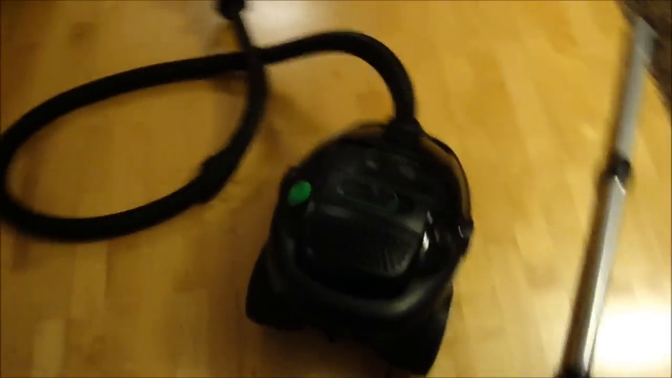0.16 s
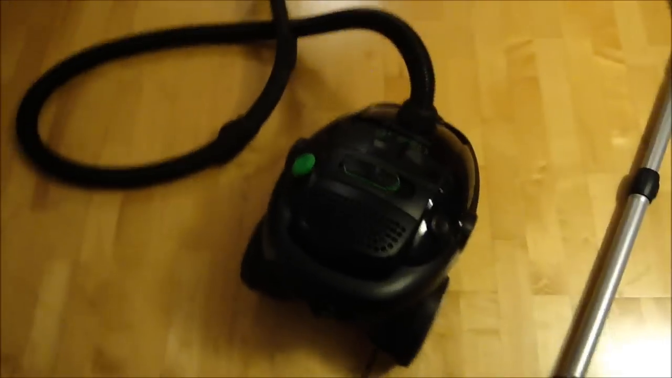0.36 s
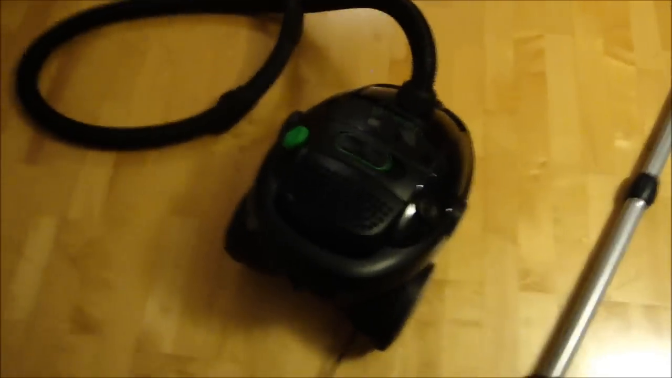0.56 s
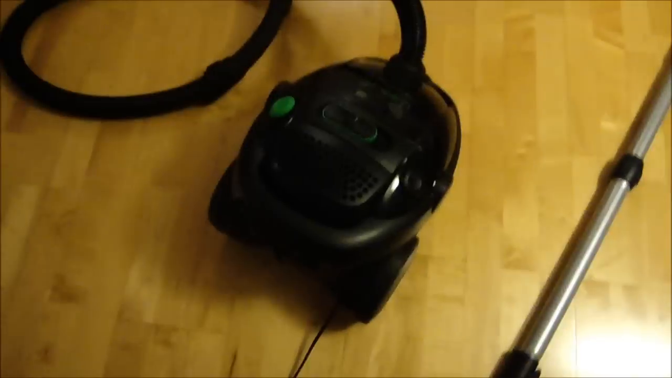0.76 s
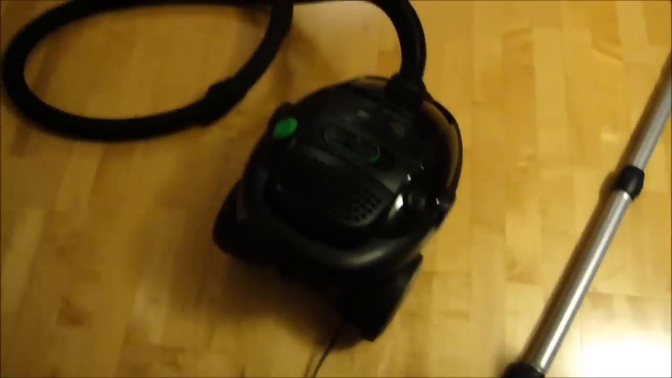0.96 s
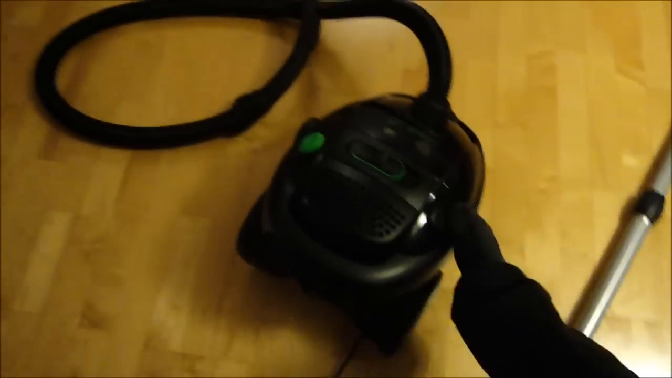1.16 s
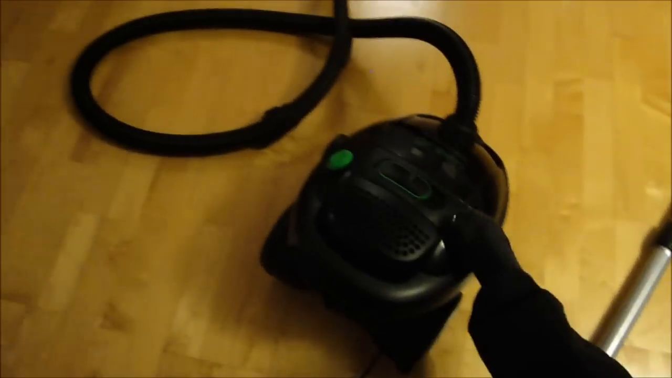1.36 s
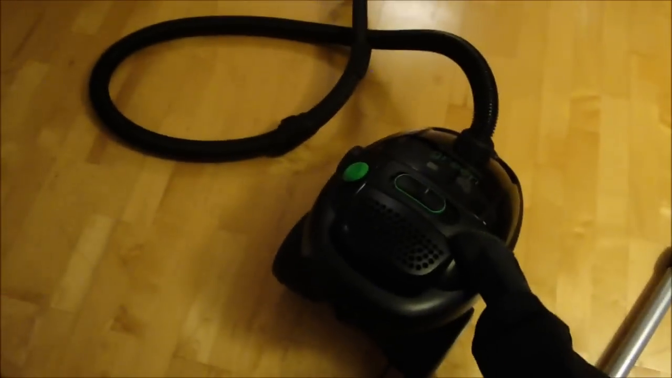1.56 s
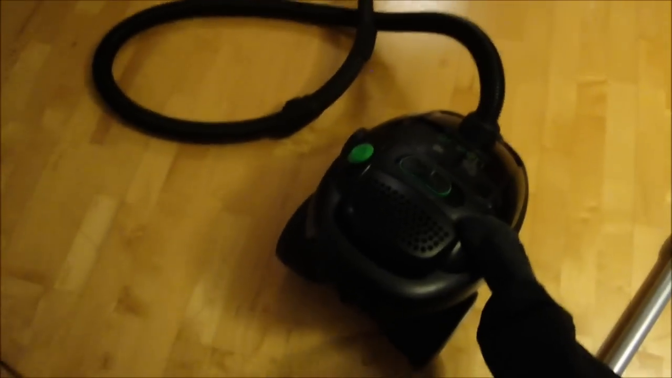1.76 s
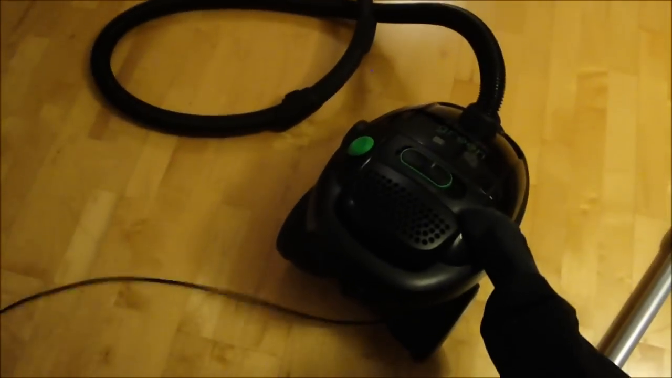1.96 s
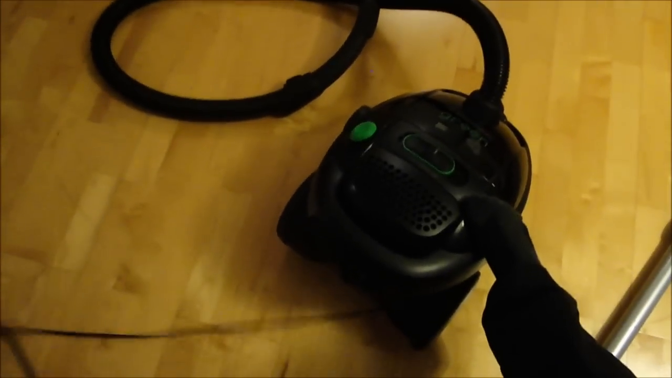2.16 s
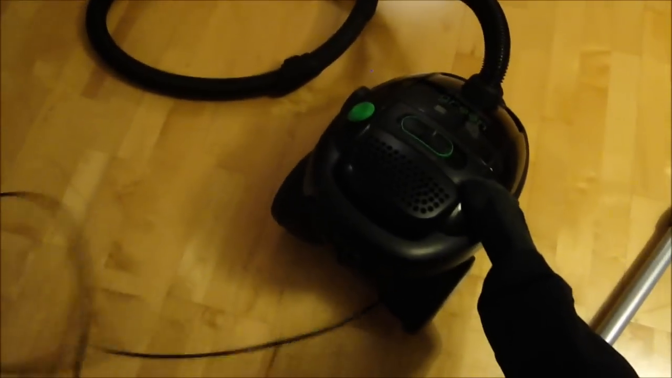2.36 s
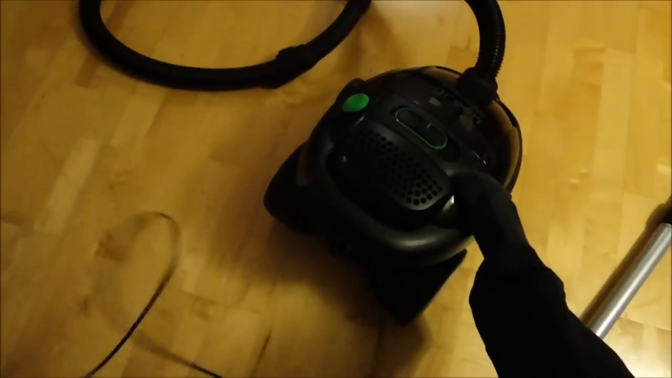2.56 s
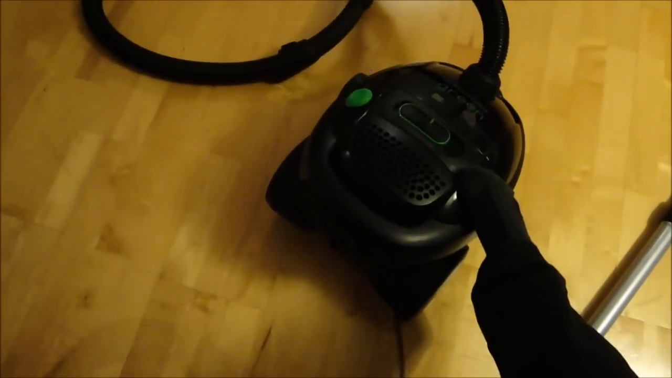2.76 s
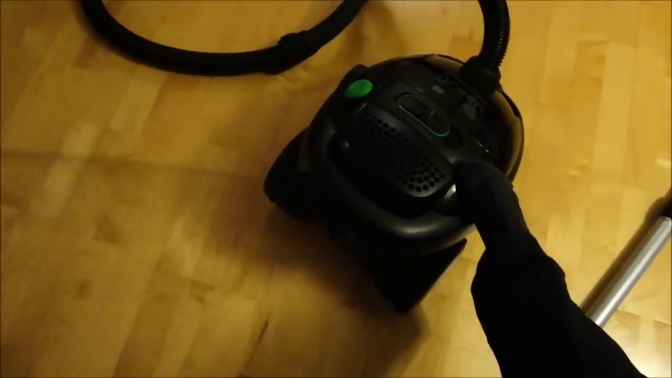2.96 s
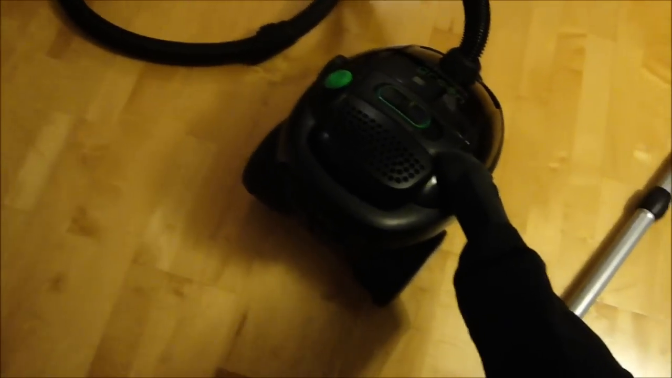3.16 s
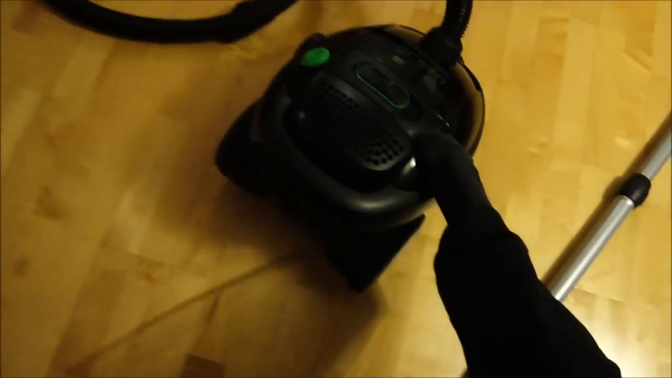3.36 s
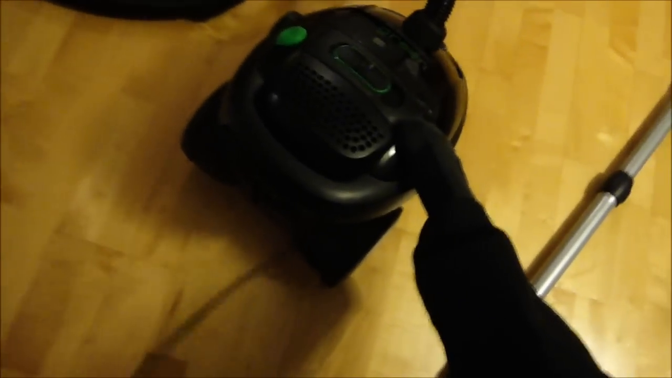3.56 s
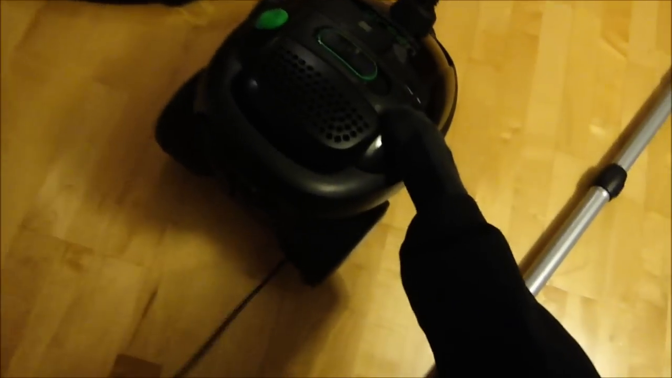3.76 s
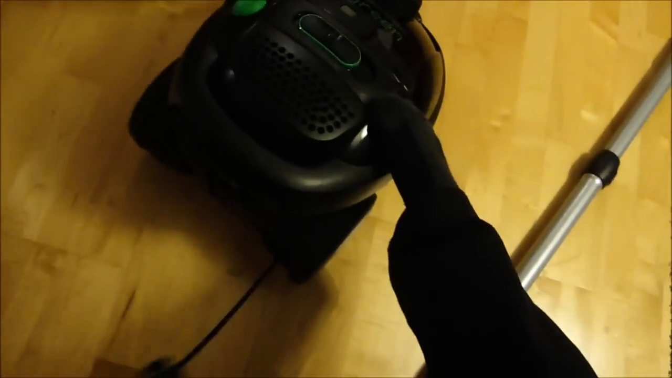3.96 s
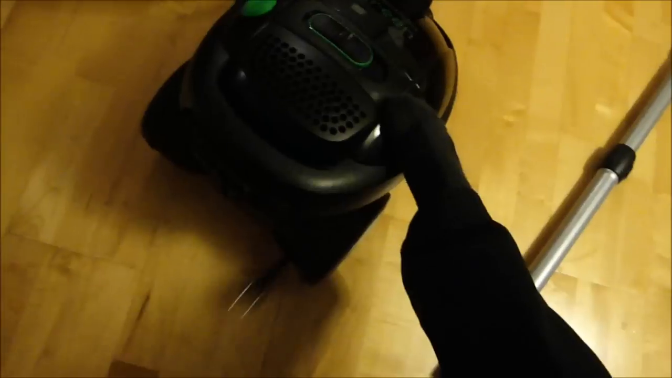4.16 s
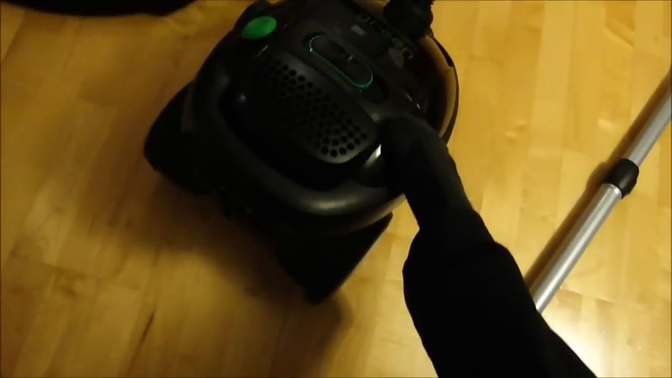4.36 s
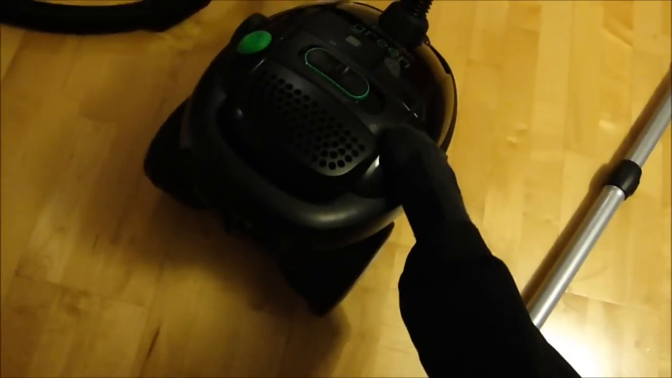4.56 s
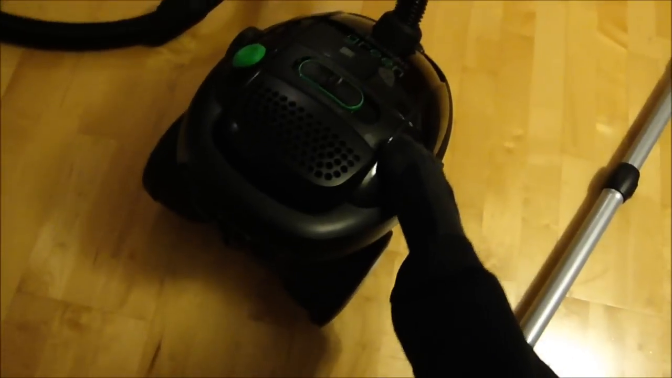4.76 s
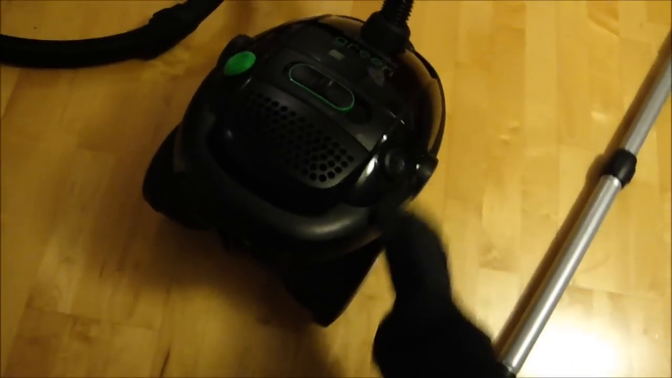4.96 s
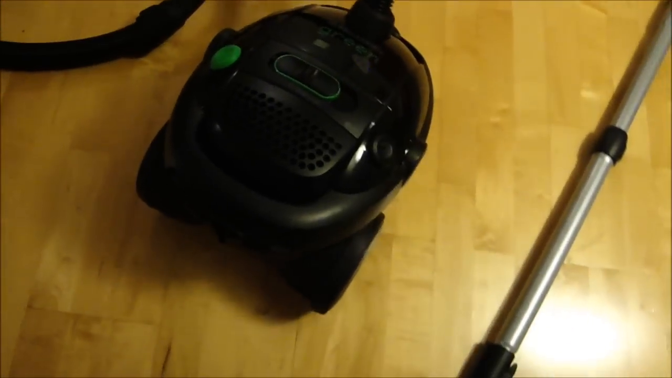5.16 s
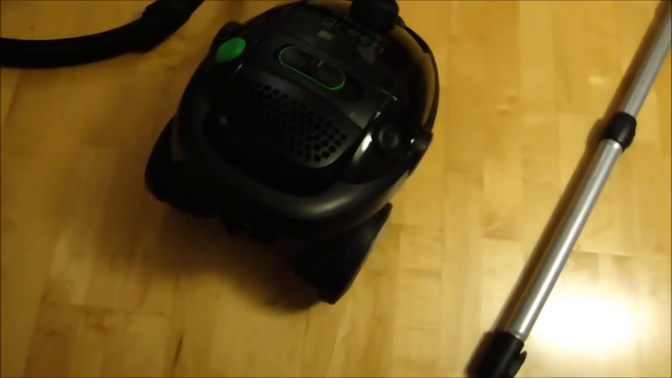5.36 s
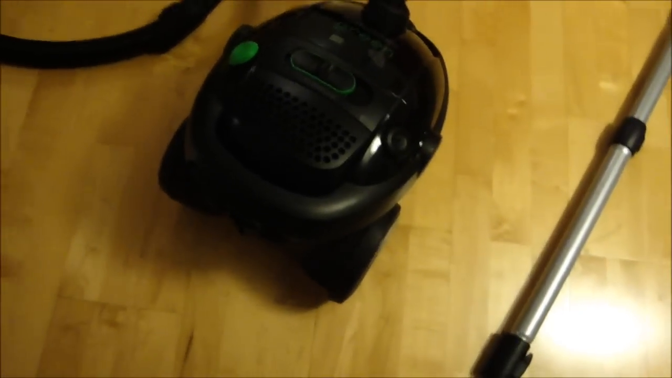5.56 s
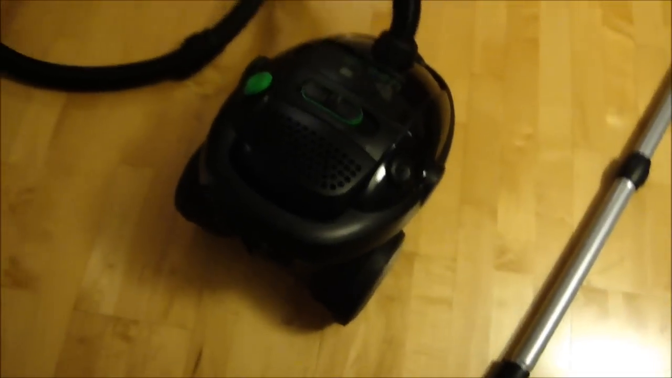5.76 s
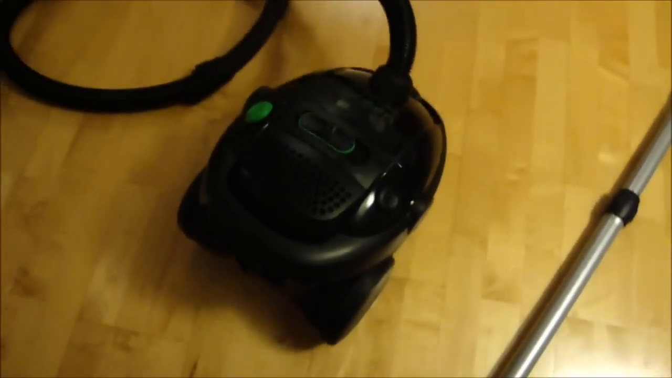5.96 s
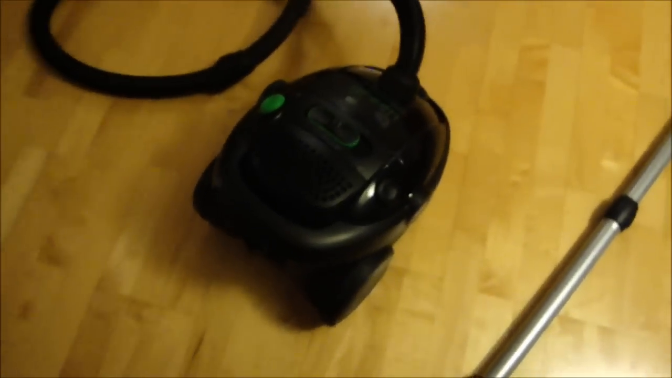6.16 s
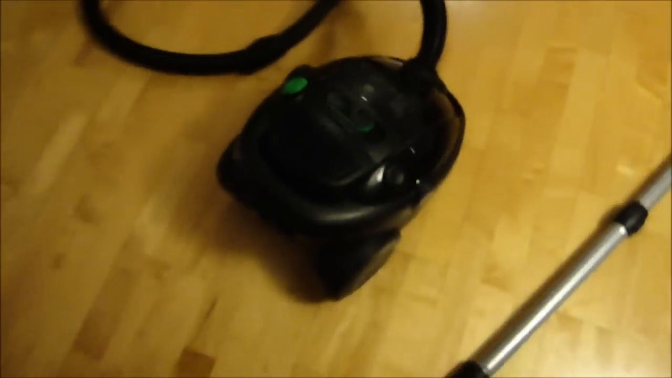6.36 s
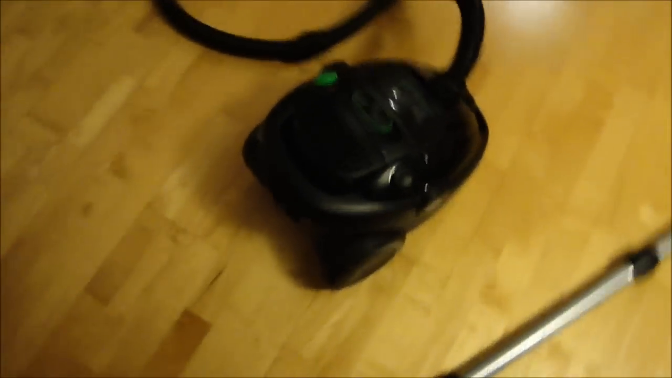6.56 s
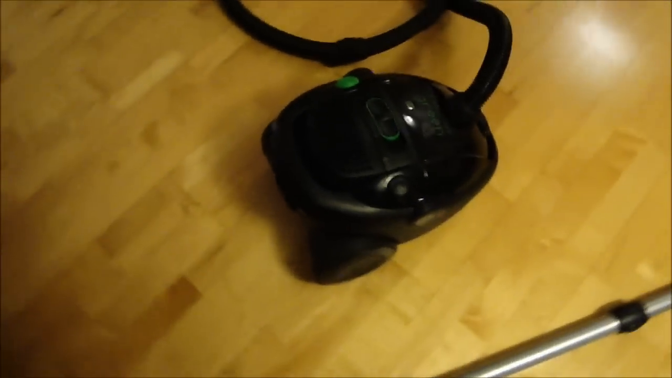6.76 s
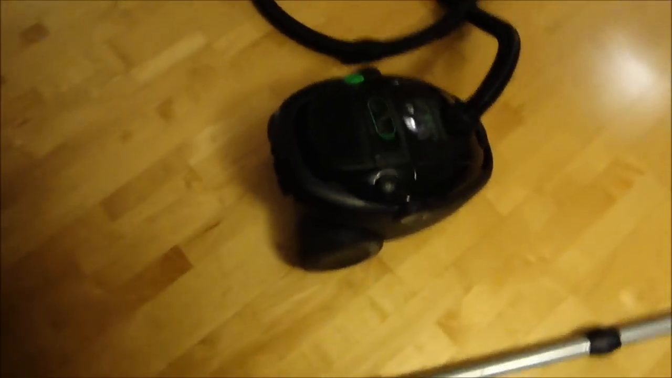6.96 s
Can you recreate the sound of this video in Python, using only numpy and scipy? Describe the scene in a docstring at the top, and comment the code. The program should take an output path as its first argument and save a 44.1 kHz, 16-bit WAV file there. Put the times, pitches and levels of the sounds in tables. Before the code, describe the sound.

Close, plain sound of a vacuum cleaner rewinding its cable indoors: quiet scuffing first, then a whirring plastic chatter with scraping cord and irregular hard slaps on floor and casing. The whipping thins as the reel slows with faint squeaks. A heavy bang and rattling shudder end the run, ringing briefly in the lively room. Afterward only light rustles, faint rapid motor ticks, a few knocks and low background noise remain.

```python
"""Vacuum cleaner cord rewinding on a wooden floor

In a small hard room feet shuffle and small knocks sound close to the microphone. With the rewind pedal down,
the spring reel rattles in its plastic housing (random contacts ringing resonances) and the cord hisses over
the boards (coloured contacts) and whips floor and shell (short noise bursts). The slowing reel squeaks in thin
tones, the plug slams home, the shell shudders, and a small motor ticks. Room hum and microphone hiss lie below.
"""
import sys
import numpy as np
from scipy import signal
from scipy.fft import rfft, irfft
from scipy.io import wavfile
from scipy.ndimage import uniform_filter1d

SR = 44100
rng = np.random.default_rng(int(sys.argv[2]) if len(sys.argv) > 2 else 0)


def to_wav(sig):
    """Store sig (one row per channel, or 1-D mono) as 16-bit WAV at the path in sys.argv[1].

    Samples outside -1..1 are clipped; the rate is SR.
    """
    pcm = np.clip(np.atleast_2d(sig), -1, 1) * 32767
    pcm = np.round(pcm).astype(np.int16)
    wavfile.write(sys.argv[1], SR, pcm.T)  # frames by channels


N = 308700
T = np.arange(N) / SR

# cord and plug whip floor and shell; levels hold before the bass cut of the shell:
# (time [s], peak level [dB], centre pitch [Hz], snap relative to the peak [dB])
WHIPS = [(1.6021, -32, 1800, -8), (1.728, -26, 670, -20), (1.7653, -24, 1180, -34),
         (1.8544, -23.5, 1720, -2.5), (1.9641, -13, 2310, 4.5), (1.9708, -14, 1900, 3),
         (2.2366, -17.5, 3280, -30), (2.2866, -20.5, 1660, -9), (2.2994, -21, 970, 4),
         (2.3084, -15.5, 1380, 2), (2.4488, -9.5, 1190, -7), (2.4869, -9.5, 1060, -9),
         (2.5223, -9, 2530, 2.5), (2.5415, -8.5, 970, -4), (2.5802, -6, 1070, -5.5),
         (2.5841, -10, 1180, -7), (2.5954, -7.5, 950, -14), (2.6044, -8.5, 2120, -4),
         (2.6266, -9.5, 1510, -8), (2.6855, -14, 3160, 7), (2.7134, -20, 950, -25),
         (2.7478, -6.5, 1150, -14), (2.7657, -8.5, 2060, -7), (2.8223, -16, 1880, -7),
         (2.858, -14, 1610, -9), (2.8874, -8.5, 2070, -4), (3.029, -19.5, 1200, -10),
         (3.0559, -16, 990, -22), (3.0722, -26.5, 1630, -4), (3.1877, -24, 1210, -12),
         (3.2001, -7, 1360, -6), (3.3022, -13, 1280, -13), (3.3716, -13, 1280, -19),
         (3.3779, -6.5, 925, -5), (3.525, -20.5, 990, -33), (3.9184, -30, 1630, -32),
         (4.0035, -25, 1000, -12), (4.047, -18.5, 1180, -17), (4.0762, -25, 1100, -13),
         (4.108, -5, 664, -35), (4.118, -33, 1820, -15), (4.1426, -13, 800, -32), (4.2196, -13.5, 810, -23),
         (4.2349, -3.5, 1150, -30), (4.2395, -19, 1200, -31), (4.2534, -1, 950, -31),
         (4.2835, -29, 982, -28)]


def undb(db):
    """Amplitude factor of a level in dB."""
    return 10 ** (np.asarray(db) / 20)


def unit(x):
    """Scale to an RMS of 1."""
    return x / np.sqrt(np.mean(x ** 2))


def band(x, lo_hz, hi_hz):
    """Fourth-order band-pass."""
    return signal.sosfilt(signal.butter(2, [lo_hz, hi_hz], "bandpass", fs=SR, output="sos"), x)


def colour(x, points):
    """Shape by a spectrum of (frequency [Hz], gain [dB]), straight over log frequency."""
    hz, db = np.transpose(points)
    f = np.arange(len(x) // 2 + 1) * SR / len(x) + 1  # 1 Hz up, to keep the logarithm finite
    gain = undb(np.interp(np.log(f), np.log(hz), db))
    return irfft(rfft(x) * gain, len(x))


def ring(x, modes):
    """Sum of two-pole resonances; neighbours swing in opposite sense."""
    out = 0
    for k, (hz, width, db) in enumerate(modes):
        b, a = signal.iirpeak(hz, hz / width, fs=SR)
        out = out + (-1) ** k * undb(db) * signal.lfilter(b, a, x)
    return out


def curves(table):
    """Columns along time, silent outside the table."""
    s, *columns = np.transpose(table)
    return [np.interp(T, s, c, left=-120, right=-120) for c in columns]


def grains(per_s, spread_db):
    """Dense random contacts whose strengths are spread exponentially in dB: upward, or downward if negative."""
    hit = rng.random(N) < per_s / SR
    strength = undb(spread_db * rng.exponential(size=N).clip(0, 4))
    return unit(hit * rng.standard_normal(N) * strength)


def walk(rate):
    """Random wander with an RMS of 1 that heads for a new value every 1 / rate seconds."""
    k = int(SR / rate)
    held = np.repeat(rng.standard_normal(N // k + 1), k)
    return unit(uniform_filter1d(held, k)[:N])


def swell(start, length):
    """A half-sine rise and fall."""
    return np.sin(np.pi * np.clip((T - start) / length, 0, 1))


def small(x):
    """A small shell radiates little bass."""
    return signal.sosfilt(signal.butter(2, 420, "highpass", fs=SR, output="sos"), x)


def quiet():
    """Room hum and microphone hiss: coloured noise that wavers slightly."""
    # spectrum of the empty room and the microphone: (frequency [Hz], gain [dB per Hz])
    background = [(18, -50), (30, -31), (135, -8.5), (392, -0.5), (443, -3.5), (675, -2.5), (726, -4),
                  (907, -5.5), (1190, -5.5), (1490, -8.5), (9250, -18.5), (11000, -21.5), (14300, -65),
                  (22000, -120)]
    level_db = -50
    return unit(colour(rng.standard_normal(N), background)) * undb(level_db + .5 * walk(2.68))


def shuffle():
    """Socks and cloth rub the boards: random contacts make a dull scuff and a soft rustle."""
    # (loudest moment [s], rise and fall time, each [s], low scuff level [dB], rustle level [dB])
    rubs = [(0.023, 0.29, -50, -51), (0.237, 0.056, -52, -49.5), (0.377, .14, -45, -43),
            (0.558, 0.15, -47.5, -46.5), (0.622, 0.06, -64, -48.5), (0.726, .12, -50.5, -52.5),
            (0.848, 0.073, -49.5, -47.5), (0.988, 0.16, -55.5, -56), (1.226, 0.14, -53.5, -57),
            (4.89, 0.058, -39, -54), (4.97, 0.082, -53, -65), (5.13, 0.08, -62, -58),
            (6.76, 0.16, -66, -56.5), (6.99, 0.074, -63, -59)]
    scuff_level, rustle_level = np.zeros((2, N))
    for s, length, scuff_db, rustle_db in rubs:
        stroke = swell(s - length, 2 * length) ** 2
        scuff_level += undb(scuff_db) * stroke
        rustle_level += undb(rustle_db) * stroke
    rub = grains(per_s=5000., spread_db=-2.0)
    scuff = unit(band(rub, 520.0, 1000.0))
    rustle = unit(band(rub, 1240.0, 3120.0))
    return scuff_level * scuff + rustle_level * rustle


def blows(table, thud_db, crack_db, spike):
    """Each blow: a hard first contact, then rubble; a body at its own pitch, a thud, a broad crack and a snap."""
    thud_hz, crack_hz = 758, 1620  # shared by all blows
    ring_t60_s, rise_s = 0.043, 0.0003  # the powers of the fall below lengthen or shorten the ring
    out, t = np.zeros(N), T[:SR // 4]
    noise = rng.standard_normal((len(table), 4, len(t)))
    noise *= np.clip(t / rise_s, 0, 1)
    noise[:, :, :2] = spike  # first contact, against rubble of RMS 1
    fall = np.exp(-np.log(1000) * t / ring_t60_s)
    for (s, peak_db, hz, snap_db), (a, b, c, d) in zip(table, noise):
        body = band(a * fall ** 0.99, hz / 1.63, hz * 1.465)
        crack = band(b * fall, crack_hz / 2.47, crack_hz * 2.12)
        snap = band(c * fall ** 1.46, 2600.0, 8500.0)
        thud = band(d * fall ** 0.57, thud_hz / 1.35, thud_hz * 1.55)
        blow = 0
        for db, part in ((0, body), (thud_db, thud), (crack_db, crack), (snap_db, snap)):
            # the peak of each part is read from its envelope over two milliseconds
            peak = np.sqrt(2 * uniform_filter1d(part ** 2, size=88).max())
            blow = blow + undb(peak_db + db) * part / peak
        i = int(s * SR)
        out[i:i + len(t)] += blow[:N - i]
    return out


def knocks():
    """Small knocks and ticks near the microphone: short bursts with a mild first contact."""
    # (time [s], peak level [dB], centre pitch [Hz], snap relative to the peak [dB])
    taps = [(.5902, -31.5, 2390, -8), (.7148, -35, 344, -14), (.826, -37.5, 1500, -6),
            (1.4385, -36.5, 3250, 3.5), (4.7784, -55, 1560, 11.5), (4.8921, -27.5, 577, -15),
            (4.9072, -33.5, 566, -6.5), (4.934, -34, 660, -4), (5.9765, -50, 540, 5.5),
            (6.088, -48, 633, 3), (6.3112, -25, 1310, -22), (6.3173, -26, 366, -8),
            (6.3251, -28.5, 450, -19), (6.405, -51, 1280, 9.5), (6.8294, -42.5, 533, -16)]
    return blows(taps, thud_db=-8, crack_db=-9, spike=2.3)


def whips():
    """Cord and plug strike floor and shell with a hard first contact; dealt in turn into three groups."""
    return [small(blows(WHIPS[k::3], thud_db=-11, crack_db=-8.5, spike=3.84)) for k in range(3)]


def rewind():
    """The reel chatters into the shell modes; the cord scrapes the boards, brighter when its slide is louder."""
    # reel and cord with the pedal down: (time [s], rattle of the shell [dB], cord slide [dB])
    run = [(1.601, -45, -60), (1.67, -45, -55), (1.77, -38, -44), (1.89, -40, -31), (2.05, -36, -31),
           (2.2, -37, -29), (2.33, -34, -25), (2.46, -34, -24), (2.64, -32, -27), (2.78, -29, -33),
           (2.91, -28, -40), (3.03, -40, -50), (3.19, -41, -52), (3.37, -42, -47), (3.54, -42, -49),
           (3.7, -45, -52), (3.9, -44, -52), (3.93, -41, -44), (4.0, -37, -44), (4.105, -50, -43)]
    # modes of the shell under the rattling reel: (frequency [Hz], width [Hz], gain [dB])
    shell_modes = [(620, 110, 0), (1010, 60, 5), (1160, 90, -2), (1610, 70, 1), (1950, 250, -6),
                   (2220, 80, -8), (3040, 90, -5), (3400, 90, -10), (4700, 1000, -16)]
    # spectrum of the cord on the boards: (frequency [Hz], gain [dB per Hz])
    slide_colour = [(240, -25), (400, -54), (623, 1), (882, 0.5), (1180, -1.5), (1370, 1.5), (2560, 4),
                    (5500, -3.5), (11000, -14.5), (14300, -52), (22000, -120)]
    shake_db, shake_t60_s = -26, 0.32  # shake relative to the peak of each whip
    full_run_db, bright_db, bright_per_db = -25, 0.5, 0.2  # treble lift at full run, and its change per dB
    shell_db, slide_db = curves(run)

    # every whip shakes the loose reel for a moment; the powers add
    shake_power = sum((T > s) * undb(2 * (db + shake_db - 60 * abs(T - s) / shake_t60_s))
                      for s, db, *_ in WHIPS)
    rattle_level = np.hypot(undb(shell_db), np.sqrt(shake_power))
    chatter = grains(per_s=3000., spread_db=1.5)
    shell = unit(ring(chatter, shell_modes) + undb(-11.0) * band(chatter, 574.0, 1320.0))
    shell = shell * undb(2.7 * walk(30.))

    slide = unit(colour(grains(per_s=6000., spread_db=1.5), slide_colour)) * undb(1.2 * walk(15.))
    treble = band(slide, 4500., 12000.)
    bright = undb(bright_db + bright_per_db * (slide_db - full_run_db))
    return shell * rattle_level + undb(slide_db) * (slide + (bright - 1) * treble)


def squeaks():
    """Stick-slip of the brake as the reel slows: thin tones that waver in pitch and strength."""
    # (start [s], length [s], pitch at the start [Hz], glide [Hz per s], level about which it wavers [dB])
    tones = [(3.76, .135, 4100, -320, -50), (3.6, .28, 3050, -75, -54), (3.55, .19, 1620, -110, -51),
             (3.62, .3, 1020, -60, -48), (3.93, .07, 4800, 1500, -50), (3.94, .055, 1070, 1250, -36)]
    out = 0
    for start, length, hz, glide, db in tones:
        turns = np.cumsum(hz + glide * (T - start) + 25. * walk(99.0)) / SR
        level = np.sqrt(swell(start, length).clip(0)) * undb(db + 4.8 * walk(100.0))
        out = out + level * np.sin(2 * np.pi * turns)
    return out


def shudder():
    """The stopped reel and the wheels rumble: random contacts ring the low modes of the shell."""
    # after the plug strikes and again when it rebounds: (start [s], hold [s], level before the fall [dB])
    shakes = [(4.119, 0.079, -16.5), (4.275, 0.025, -22.5)]
    # low modes of the shell, shaken by random contacts after the plug strikes:
    # (frequency [Hz], width [Hz], gain [dB])
    low_modes = [(520, 100, 2), (690, 110, -1), (830, 100, -4), (1060, 160, -4), (1250, 150, -10),
                 (1700, 400, -16)]
    attack_s, fall_db_per_s = .005, 183
    contacts = grains(per_s=1500., spread_db=2.5)
    rumble = unit(ring(contacts, low_modes) + undb(-15) * band(contacts, 1020.0, 2240.0))
    rumble = rumble * undb(1.7 * walk(60.))
    level = 0
    for s, hold, db in shakes:
        fall_db = fall_db_per_s * np.clip(T - s - hold, 0, None)
        level = level + np.clip((T - s) / attack_s, 0, 1) * undb(db - fall_db)
    return rumble * level


def ticking():
    """Even steps of a small motor at the microphone, each ringing one short mode twice over."""
    # (start [s], end [s], peak level about which the steps scatter [dB])
    spells = [(4.52, 4.69, -52), (4.955, 5.12, -48)]
    # (frequency [Hz], width [Hz], gain [dB])
    motor_mode = [(6060, 450, 0)]
    ticks_per_s = 65
    steps = np.zeros(N)
    for start, end, db in spells:
        at = (np.arange(start, end, 1 / ticks_per_s) * SR).astype(int)
        steps[at] = undb(db + 3.6 * rng.standard_normal(len(at)))
    impulse = 1. * (T[:SR // 100] == 0)
    tick = ring(ring(impulse, motor_mode), motor_mode)
    return signal.fftconvolve(steps, tick / abs(tick).max())[:N]


def boards(loud):
    """The floor rumbles along: low noise that follows the loudness of machine and whips."""
    return undb(-29) * loud * unit(band(rng.standard_normal(N), 123.0, 346.0))


def room(x):
    """Diffuse tail that builds after the first walls answer; each band dies at its own rate."""
    # decay by 60 dB: (frequency [Hz], time [s])
    decay = [(250, 0.31), (700, 0.33), (2000, 0.51), (5000, 0.33), (9000, 0.28)]
    # tint of the walls: (frequency [Hz], gain [dB])
    wall_colour = [(200, 14.5), (700, 0), (2000, 1), (5000, 1), (10000, -2)]
    wall_delay_s, wall_rise_s = 0.0012, 0.031
    t, tail = T[:SR], 0
    hz, t60 = np.transpose(decay)
    for f in 180 * 2 ** np.arange(0, 6.1, .5):  # half-octave bands
        fall = np.exp(-np.log(1000) * t / np.interp(np.log(f), np.log(hz), t60))
        tail = tail + fall * band(rng.standard_normal(SR), f / 2 ** .25, f * 2 ** .25)
    tail = colour(tail, wall_colour) * np.clip((t - wall_delay_s) / wall_rise_s, 0, 1)
    return signal.fftconvolve(x, tail / np.sqrt(np.sum(tail ** 2)))[:N]


def scene():
    """Close sounds, the machine on its boards, and the answer of the room."""
    room_db, blow_room_db, knock_send_db = -7.5, -8, -23
    whip_groups, taps = whips(), knocks()
    machine = small(rewind() + squeaks() + small(shudder()))  # the shudder loses its bass twice
    direct = machine + sum(whip_groups)
    loud = np.sqrt(uniform_filter1d(direct ** 2, size=2000).clip(0))
    wet = undb(room_db) * room(machine + undb(knock_send_db) * taps)
    # each group of whips has its own random room tail
    wet = wet + undb(blow_room_db) * sum(room(w) for w in whip_groups)
    return (direct + taps + boards(loud) + wet + shuffle() + ticking() + quiet())[None]


def record(dry):
    """The capsule bends loud sound a little to one side, the peaks clip, the top is cut at 11 kHz."""
    x = np.clip(dry + .03 * dry ** 2, -.9, .9)
    return signal.sosfilt(signal.ellip(10, .2, 70, 11000, fs=SR, output="sos"), x)


dry = scene()
out = record(dry)
to_wav(out)
```